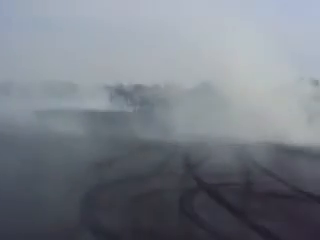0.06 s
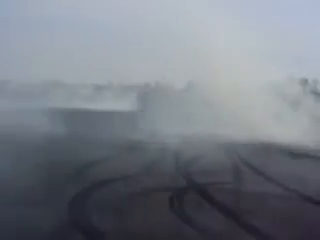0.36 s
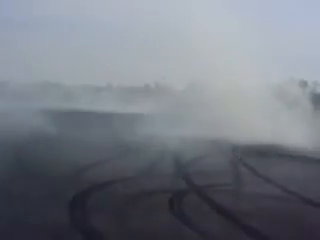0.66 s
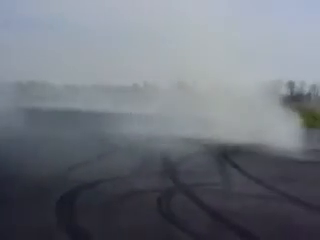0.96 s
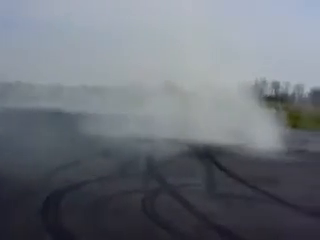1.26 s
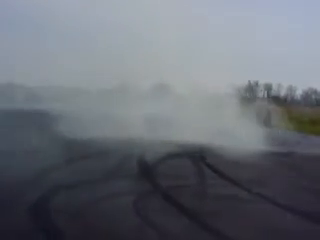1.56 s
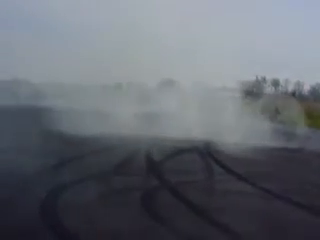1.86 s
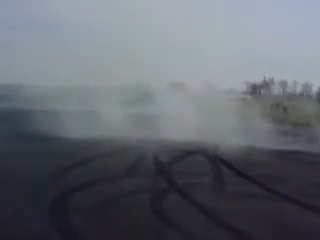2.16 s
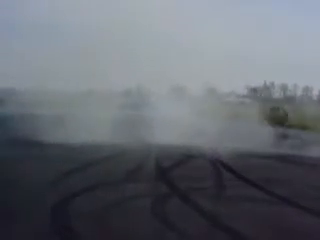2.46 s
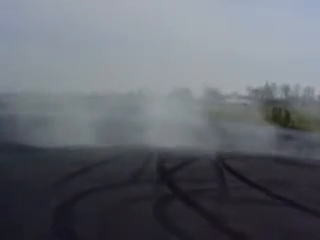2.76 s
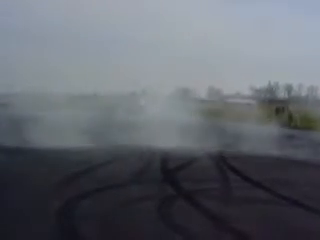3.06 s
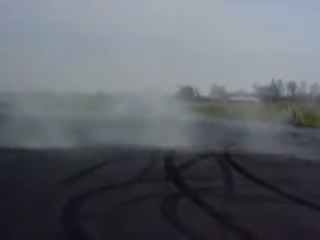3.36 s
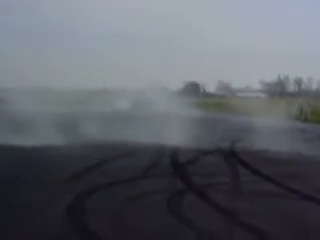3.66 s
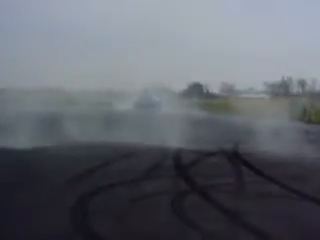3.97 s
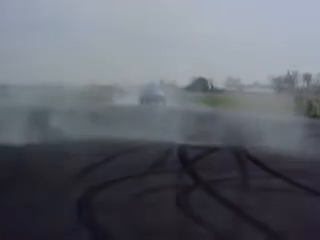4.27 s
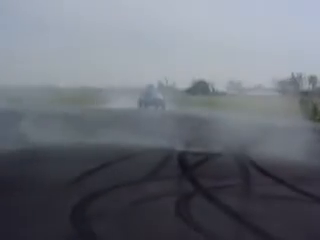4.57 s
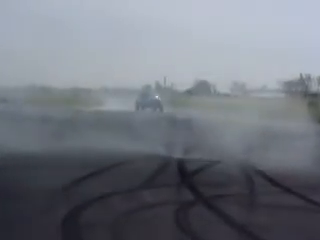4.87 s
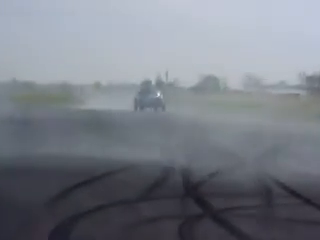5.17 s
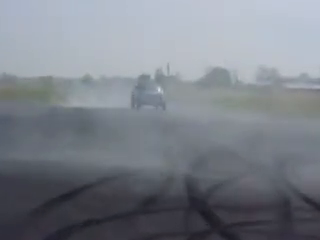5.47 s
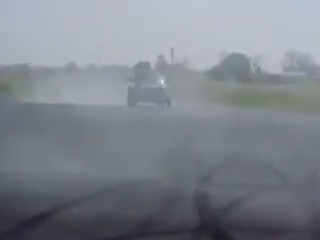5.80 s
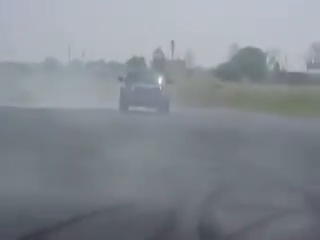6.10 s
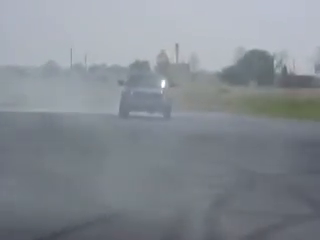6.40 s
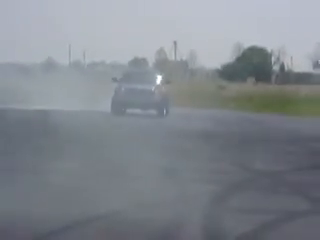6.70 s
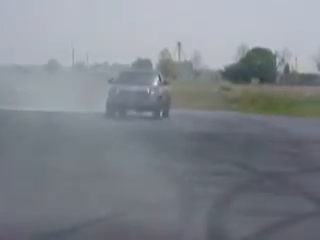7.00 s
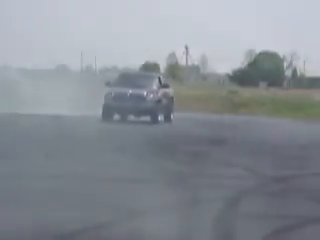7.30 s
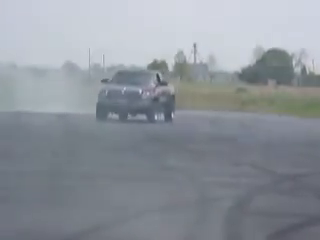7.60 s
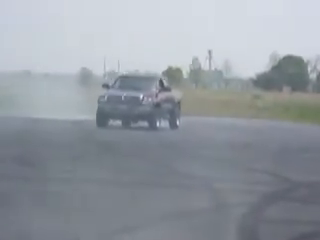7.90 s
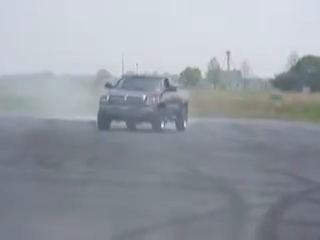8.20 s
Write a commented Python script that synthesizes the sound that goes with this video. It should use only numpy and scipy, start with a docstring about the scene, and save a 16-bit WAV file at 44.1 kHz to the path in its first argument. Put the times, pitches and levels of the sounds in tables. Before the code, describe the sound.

Loud, stuttering tyre squeals and rasping rubber cover a diesel pickup's engine for the first three and a half seconds, outdoors on open asphalt. Once the screeching stops, the engine revs up as the truck approaches, changes gear and settles into a steady rushing drone with a whine. Near the microphone are a faint diesel idle, soft wind rumble and a few small ticks.

```python
"""A diesel pickup spins its rear tyres on an open asphalt lot: they howl and scrub, then grip.
The rubber squeals because it grabs and lets go of the ground hundreds of times a second.
From far off the truck drives back with a rising exhaust drone, a whine and a broad rush, then shifts up.
Another diesel idles close by, wind nudges the microphone and a few small ticks sound near it."""
import sys
import numpy as np
from scipy import signal
from scipy.io import wavfile
from scipy.ndimage import uniform_filter1d

SR = 44100
rng = np.random.default_rng(int(sys.argv[2]) if len(sys.argv) > 2 else 0)


def put_to_file(sound):
    """Save the sound as 16-bit audio at rate SR, in the file named by the first command-line argument."""
    columns = np.atleast_2d(sound).T  # one column per channel
    safe = np.clip(columns, -1, 1)
    whole_steps = np.round(safe * 32767)
    wavfile.write(sys.argv[1], SR, whole_steps.astype(np.int16))


N = 363825


def from_db(db):
    """Turn decibels into a gain."""
    return 10 ** (np.asarray(db) / 20)


def rms_one(x):
    """Scale a signal to an average power of 1."""
    return x / np.sqrt(np.mean(x ** 2) + 1e-20)


def in_time(rows):
    """Join rows of (time, values...) with straight lines: one curve per value."""
    times, *columns = np.transpose(rows)
    return [np.interp(np.arange(N) / SR, times, column) for column in columns]


def drift(rate_hz):
    """A smooth random wobble, about 1 in size."""
    pole = np.exp(-80 * np.pi * rate_hz / SR)
    steps = rng.standard_normal(N // 40 + 2002)   # one for every 40 samples
    slow = signal.lfilter([1], [1, -2 * pole, pole * pole], steps)[2000:]
    return np.interp(np.arange(N) / 40, np.arange(len(slow)), rms_one(slow))


def phase_of(hz):
    """The phase (angle) of a tone that follows a pitch curve."""
    return 2 * np.pi * (np.cumsum(hz) / SR + rng.random())


def colour(x, spectrum):
    """Filter by a spectrum that falls 60 dB an octave past its ends; power 1."""
    hz, db = np.transpose(spectrum)
    grid = np.linspace(0, SR / 2, 2049)
    octave, known = np.log2(grid + 1), np.log2(hz)
    outside = np.abs(octave - np.clip(octave, known[0], known[-1]))
    taps = signal.firwin2(2049, grid, from_db(np.interp(octave, known, db) - 60 * outside), fs=SR)
    return rms_one(signal.fftconvolve(x, taps, "same"))


def noise(spectrum):
    """Noise with the given spectrum; power 1."""
    return colour(rng.standard_normal(N), spectrum)


def swell(start, end, rise_s, fall_s):
    """Fade in, hold, fade out; the fades are centred on start and end."""
    t = np.arange(N) / SR
    return np.clip(.5 + np.minimum((t - start) / rise_s, (end - t) / fall_s), 0, 1)


def swells(rows, rise_s, fall_s):
    """The gain of several swells, added in power."""
    return np.sqrt(sum((from_db(db) * swell(start, end, rise_s, fall_s)) ** 2 for start, end, db in rows))


# the light breeze (time [s], level [dB])
BREEZE_LEVEL = [(0, -49), (1.7, -57.5), (2.5, -41.5), (3.4, -47), (8.25, -39)]
# gusts on the microphone (start [s], end [s], level [dB])
WIND_GUSTS = [(-.1, .12, -32), (.57, .88, -31.5), (1.26, 1.37, -31.5), (2.64, 2.82, -32), (7.24, 7.45, -32)]
# the wind's rumble (frequency [Hz], relative level [dB])
WIND_SPECTRUM = [(20, -31), (45, -6), (80, -4), (130, 1), (230, -1), (350, -14.5), (600, -27)]
def wind():
    """Gusts over a light breeze bump the microphone with a low, lumpy rumble."""
    breeze_db, = in_time(BREEZE_LEVEL)
    level = np.hypot(from_db(breeze_db), swells(WIND_GUSTS, rise_s=.17, fall_s=.14))
    return level * from_db(2 * drift(11)) * noise(WIND_SPECTRUM)


# tones of the idle (multiple of the firing rate, relative level [dB])
IDLE_TONES = [(1, -43.5), (2, -41), (3, -46), (4, -57), (7, -58.5), (9, -44)]
# how loud the idle is (time [s], relative level [dB])
IDLE_LOUDNESS = [(0, -12.5), (1.5, -28), (3, -5.5), (4, -0.5), (8.25, 2)]
def idling_diesel(firing_hz=38.55):
    """The even firing of a diesel parked close by makes a low hum."""
    level_db, = in_time(IDLE_LOUDNESS)
    phase = phase_of(firing_hz * (1 + .0044 * drift(5.9)))
    hum = sum(from_db(db + 1.9 * drift(7.7)) * np.sin(k * phase) for k, db in IDLE_TONES)
    return from_db(level_db + 2.5) * hum


# each tick (time [s], relative level [dB], treble limit [Hz])
TICK_HITS = [(4.149, -7.5, 9000), (4.184, -4, 9000), (4.3185, -16.5, 6000), (6.7893, 3.5, 4200)]
def ticks(crunch_s=.0016):
    """Small hard things touch near the microphone: a dry snap and crunch in a body that barely rings."""
    hits = 0
    for start, db, top_hz in TICK_HITS:
        age = (np.arange(N) - int(start * SR)) / SR
        crunch = (age > 0) * np.exp(-np.clip(age / crunch_s, 0, 20)) * rng.choice([-1, 1], N)
        force = (age == 0) + from_db(-18) * crunch
        hits = hits + from_db(db) * signal.sosfilt(signal.butter(2, top_hz, fs=SR, output="sos"), force)
    snap = signal.sosfilt(signal.butter(4, 2800, "high", fs=SR, output="sos"), hits)
    body = signal.sosfilt(signal.butter(2, (2950, 4900), "band", fs=SR, output="sos"), snap)
    return from_db(-5) * snap + from_db(4) * body


def open_lot(x, dull_hz=2500, delay_s=.014, fade_s=.59, echo_db=-9):
    """The ground and far walls scatter back a faint, dull wash of echoes."""
    t = np.arange(SR // 2) / SR
    echoes = rng.standard_normal(len(t)) * (t > delay_s) * from_db(-60 * t / fade_s)
    dull = signal.sosfilt(signal.butter(1, dull_hz, fs=SR, output="sos"), x)
    return x + from_db(echo_db) * signal.fftconvolve(dull, echoes / np.sqrt(np.sum(echoes ** 2)))[:N]


# the whine (time [s], pitch [Hz], relative level [dB], steady share [0-1])
WHINE_PATH = [(4.4, 795, -54, 0), (5.15, 808, -41, .2), (5.6, 808, -44.5, .1), (6.6, 812, -40.5, .3),
              (7.3, 819, -35.3, .8), (8.25, 828, -34, .85)]
# its tones (multiple of the pitch, relative level [dB])
WHINE_TONES = [(1, 1.5), (2, -10.5), (2.12, -8)]
def driveline_whine():
    """The parts that turn the wheels sing, wavering from afar and firming up as the truck nears."""
    pitch, level_db, steady = in_time(WHINE_PATH)
    out = 0
    for k, db in WHINE_TONES:
        phase = phase_of(k * pitch * (1 + .003 * drift(45)))
        wavering = drift(22) * np.sin(phase) + drift(22) * np.cos(phase)
        tone = np.sqrt(steady) * np.sin(phase) + np.sqrt((1 - steady) / 2) * wavering
        out = out + from_db(level_db + db + 3.5) * tone
    return out


# the gears' note (time [s], base pitch [Hz], level [dB])
GEAR_PATH = [(6.1, 160.7, -62), (6.8, 166, -43), (7.6, 168.7, -41), (8.25, 174, -35.5)]
# its tones (multiple of the base pitch, relative level [dB])
GEAR_TONES = [(10, -4), (11, -3), (12, 0), (13, -7)]
def gears():
    """Thin gear notes climb with the truck's speed."""
    base_hz, level_db = in_time(GEAR_PATH)
    shaft = phase_of(base_hz * (1 + .003 * drift(90)))
    return sum(from_db(level_db + db + 2 * drift(15)) * np.sin(k * shaft) for k, db in GEAR_TONES)


# the rush, growing as the truck drives back (time [s], relative level [dB])
RUSH_LEVEL = [(0, -2.5), (.8, 1), (1.1, -11), (2, -4.5), (2.7, -3.5), (3.9, -6), (4.6, -4), (6.2, 0),
              (8.25, 1.8)]
# how hard the engine works (time [s], load [0-1])
ENGINE_LOAD = [(4.1, 0.16), (4.7, 0.95), (6.3, 0.96), (7, 0.73), (8.25, 0.76)]
# low roar, fuel injector clatter and air hiss, each (frequency [Hz], relative level [dB])
ROAR_SPECTRUM = [(45, -2.5), (95, -9.5), (140, -3), (185, -5), (250, -2), (355, -1), (430, -3), (520, -2.5),
                 (700, -2.5), (930, -6.5), (1130, -4.5), (1320, -10.5), (1600, -11)]
CLATTER_SPECTRUM = [(740, -27.5), (1250, 0), (1510, -7.5), (1710, 1.5), (1860, -0.5), (2060, 0),
                    (2160, 1.5), (2830, -0.5), (2980, -1), (3310, -11.5), (3800, -22.5), (4940, -44),
                    (8360, -120)]
AIR_SPECTRUM = [(1880, -26.5), (3200, -12), (3310, -4.5), (3840, -6), (5230, -7.5), (5890, -14),
                (7060, -13), (8030, -17.5), (8920, -16.5), (9310, -16.5), (10000, -27), (13000, -63.5),
                (22000, -120)]
def rush(firing):
    """Engine noise pulses with each firing; hard work deepens the roar's puffs and lifts the rest."""
    level_db, = in_time(RUSH_LEVEL)
    load, = in_time(ENGINE_LOAD)
    step_db = 2 * (np.arange(N) / SR > 6.7)   # the hiss steps up for the last stretch
    knock = rms_one((1 + .062 * np.sin(firing)) * from_db(drift(59)))
    puffs = rms_one(1 + load * (.3 * np.sin(firing) + .2 * np.sin(firing / 2)))
    roar = from_db(-28.5 + .5 * drift(5.6)) * puffs * noise(ROAR_SPECTRUM)
    clatter = from_db(-38 + 8.5 * load) * noise(CLATTER_SPECTRUM)
    hiss = from_db(-46.5 + 4.5 * load + step_db) * noise(AIR_SPECTRUM)
    return from_db(level_db) * (roar + knock * (clatter + hiss))


# engine speed, climbing until the gear change (time [s], firing rate [Hz])
ENGINE_SPEED = [(0, 115), (.6, 120), (.85, 104), (4.5, 106), (4.8, 121), (5.25, 131), (5.6, 144),
                (6.15, 155), (6.6, 164), (6.95, 124), (7.38, 128), (7.8, 126.7), (8.25, 129.5)]
# the driver presses the pedal (start [s], end [s], exhaust level [dB])
PEDAL_PRESSES = [(-.1, .35, -40), (.4, .78, -35.5), (4.58, 5.28, -39), (5.58, 6.55, -37.5), (7.0, 8.5, -43)]
# exhaust tones (multiple of the firing rate, gain before the gear change [dB], gain after [dB])
EXHAUST_TONES = [(.5, -13, -13), (1, 3, -7), (1.5, -7, -12), (2, -4, 7.5), (2.5, -6, -11), (3, -4, -12),
                 (3.5, -5, -12), (4, -11, -10), (6.5, -8, -14), (7, -6.5, -10), (7.5, -8, -12),
                 (9, -13, -10)]
# where the exhaust pipe rings (frequency [Hz], half width [Hz], boost [dB])
PIPE_RESONANCES = [(231, 8, 7), (278, 8, 11), (373, 30, 4), (1150, 57, 7)]
def exhaust(shift_s=6.88, coasting_db=-51.5):
    """Firings drone through the pipe, then boom in the higher gear. Gives the sound and firing phase."""
    firing_hz, = in_time(ENGINE_SPEED)
    level = np.hypot(from_db(coasting_db), swells(PEDAL_PRESSES, rise_s=.25, fall_s=.18))
    shifted, = in_time([(shift_s - .1, 0), (shift_s + .1, 1)])
    firing = phase_of(firing_hz * (1 + .006 * drift(22)))
    drone = 0
    for k, before_db, after_db in EXHAUST_TONES:
        tone_db = before_db + shifted * (after_db - before_db)
        pipe_db = sum(db / (1 + ((k * firing_hz - hz) / width) ** 2) for hz, width, db in PIPE_RESONANCES)
        drone = drone + from_db(tone_db + pipe_db + 2 * drift(13)) * np.sin(k * firing)
    return level * drone, firing


# scrubbing rubber, its hiss and its rasp, each (frequency [Hz], relative level [dB])
SCRUB_SPECTRUM = [(330, -17.5), (420, -4), (800, 4), (1000, -2.5), (1450, -4.5), (1710, 1.5), (1990, -3),
                  (2520, 1), (2840, -6.5), (3340, -13.5), (3730, -31), (5000, -27)]
HISS_SPECTRUM = [(2060, -23.5), (3500, 0.5), (3770, -5), (4740, -7.5), (6330, -15.5), (8730, -19.5),
                 (9530, -21), (10000, -29.5), (13000, -64), (22000, -120)]
RASP_SPECTRUM = [(3700, -3), (4200, -2), (4800, 1), (5300, -21)]
def scrubbing(slip_phase, scrub_db, hiss_db):
    """Each slip of the shuddering tyre throws a puff of noise; a bright rasp comes as it starts to grip."""
    shudder = rms_one(from_db(1.06 * drift(23)) * (1 + .15 * np.sin(slip_phase)))
    scrub = from_db(scrub_db + 4) * noise(SCRUB_SPECTRUM)
    grit = rng.standard_normal(N) * from_db(1.2 * drift(300))
    hiss = from_db(hiss_db + 1) * colour(grit, HISS_SPECTRUM)
    rasp = from_db(-38) * swell(2.9, 3.19, rise_s=.056, fall_s=.12) * noise(RASP_SPECTRUM)
    return shudder * (scrub + hiss + rasp)


# moments when the tread tears harder (start [s], end [s], level [dB])
TEAR_SURGES = [(.02, .135, -26), (.135, .2, -34), (.52, .62, -31), (.98, 1.04, -23), (1.19, 1.3, -27),
               (1.32, 1.43, -26), (2.98, 3.03, -24.5), (3.22, 3.29, -29.5)]
# tearing rubber (frequency [Hz], relative level [dB])
TEAR_SPECTRUM = [(1400, -10), (1650, -4.5), (1950, 0), (2250, 4), (2600, -5), (3000, -10.5)]
def tearing(slip_phase):
    """Rubber tears off in short surges, chopped up by the slips of the tread."""
    chop = rms_one((1 + .5 * np.sin(slip_phase)) * from_db(3 * drift(82)))
    return swells(TEAR_SURGES, rise_s=.017, fall_s=.028) * chop * noise(TEAR_SPECTRUM)


def loose_slip(pitch, wander, jitter, flutter_db):
    """Phase and strength of rubber that grabs and lets go on uneven asphalt."""
    phase = phase_of(pitch * (1 + wander * drift(14) + jitter * drift(219)))
    return phase, rms_one(from_db(flutter_db * drift(47)))


def locked_slip(pitch, jitter, flutter_db):
    """Phase and strength of rubber locked on one note: nearly even, with a trembling pitch."""
    phase = phase_of(pitch * (1 + .004 * drift(24.06) + jitter * drift(267)))
    return phase, rms_one(from_db(flutter_db * drift(30)))


# short shrieks (start [s], end [s], first pitch [Hz], last pitch [Hz], level [dB])
RIB_SHRIEKS = [(0, 0.17, 1315, 1335, -22), (0.071, 0.128, 1590, 1650, -22), (.13, 0.235, 1615, 1622, -24),
               (0.134, 0.233, 710, 695, -22), (.39, 0.534, 825, 845, -21.5),
               (0.501, 0.699, 705, 670, -12.5), (.52, .65, 1140, 1090, -18.5),
               (.66, 0.767, 1130, 1170, -19), (0.78, .92, 1100, 1105, -17.5), (0.72, 0.813, 683, 692, -7.5),
               (.83, .925, 695, 712, -12.5), (1.093, 1.262, 1200, 1238, -15),
               (1.152, 1.52, 1692, 1655, -22), (1.51, 1.74, 1180, 1208, -14), (1.76, 1.87, 1198, 1185, -13),
               (1.88, 2.08, 1185, 1192, -20), (2.07, 2.19, 1160, 1094, -21),
               (1.773, 2.231, 1664, 1699, -24.5), (2.03, 2.239, 630, 668, -14),
               (2.214, 2.6, 1018, 1060, -21), (2.301, 2.797, 687, 687, -23),
               (2.881, 3.024, 1185, 1220, -22), (2.894, 3.033, 1416, 1377, -20),
               (3.072, 3.2, 615, 635, -21), (3.122, 3.266, 1278, 1180, -15), (3.239, 3.47, 612, 605, -19),
               (3.26, 3.29, 590, 590, -14), (3.33, 3.45, 1100, 1130, -25)]
def shrieks():
    """Single ribs of the tread catch, glide in pitch, swell and let go."""
    out = 0
    for start, end, first_hz, last_hz, db in RIB_SHRIEKS:
        pitch, progress = in_time([(start, first_hz, 0), (end, last_hz, 1)])
        phase, strength = loose_slip(pitch, wander=.005, jitter=.011, flutter_db=2.5)
        tone = np.sin(phase) + .11 * np.sin(2 * phase)
        out = out + from_db(db) * np.sin(np.pi * progress) * strength * tone
    return out


# the other rear tyre's squeal (time [s], pitch [Hz], relative level [dB])
SECOND_TYRE_PATH = [(1.22, 774.6, -50), (1.32, 767, -16), (1.44, 754, -27), (1.5, 737, -15.5),
                    (1.59, 739, -15.5), (1.62, 754, -25), (1.67, 765, -12), (1.76, 780, -17.5),
                    (1.8, 798, -11.5), (1.88, 803, -13), (1.93, 816, -14), (1.95, 857, -27),
                    (2, 811.3, -23), (2.18, 850, -30), (2.3, 885, -51)]
def second_tyre():
    """The other rear tyre locks on to a higher note, climbs in steps and lets go."""
    pitch, level_db = in_time(SECOND_TYRE_PATH)
    phase, strength = locked_slip(pitch, jitter=.012, flutter_db=1.4)
    return from_db(level_db + 1.5) * strength * (np.sin(phase) + .14 * np.sin(2 * phase))


# the howl's overtones (multiple of a block's pitch, relative level [dB])
TREAD_OVERTONES = [(2, 4.5), (3, -6), (4, -23.5)]
def tread_howl(pitch, force, blocks=6):
    """Tread blocks howl at scattered pitches: lower, wider apart and brighter in a hard slide."""
    middle_hz = pitch * (.98 - .065 * force)
    spread = .068 + .055 * force
    lowest_hz = 580 - 100 * force ** 2   # blocks fade out below this pitch
    gains = [(k, from_db(db + 2 * (k - 3.5) * force)) for k, db in TREAD_OVERTONES]
    howl, overtones = 0, 0
    for place in np.linspace(-1, 1, blocks):
        hz = middle_hz * (1 + place * spread)
        phase, strength = loose_slip(hz, wander=.034, jitter=.036, flutter_db=4.5)
        block_db = 4.7 * place - .13 * np.maximum(lowest_hz - hz, 0)
        howl = howl + from_db(block_db) * strength * np.sin(phase)
        overtones = overtones + strength * sum(gain * np.sin(k * phase) for k, gain in gains)
    return rms_one(howl), rms_one(overtones)


def friction_limit(x, amount):
    """Friction limits how far the rubber swings, softening the throb between its tones."""
    power = uniform_filter1d(x ** 2, size=300) + .05
    return rms_one(x * power ** (-amount / 2))


# squeal bursts (start [s], end [s], relative level [dB], clean share [0-1], overtone level [dB])
SQUEAL_BURSTS = [(-.05, 0.24, -21, 0.35, -34), (0.399, 0.536, -17.5, 0.72, -34),
                 (0.512, 0.674, -11, 0.81, -22), (0.68, 0.812, -13.5, 0.57, -19),
                 (0.883, 1.003, -12, 0.76, -19.5), (1.072, 1.239, -12, 0.93, -20),
                 (1.26, 1.32, -18, .8, -24), (1.334, 1.5, -19.5, 0.2, -19), (1.62, 1.767, -13.5, 0.5, -30),
                 (1.827, 1.894, -12, 1, -26), (1.926, 2.148, -10, 0.98, -37),
                 (2.207, 2.393, -17.5, 0.41, -21.5), (2.392, 2.54, -11.5, 0.83, -20),
                 (2.577, 2.625, -18.5, .9, -26), (2.644, 2.699, -19, .95, -27),
                 (2.759, 2.85, -22.5, .9, -24), (2.89, 3.025, -21.5, 0.99, -31),
                 (3.125, 3.25, -14.5, 0.8, -19.5), (3.261, 3.363, -14.5, 0.44, -24),
                 (3.367, 3.45, -17, .6, -25.5), (3.46, 3.533, -26, .6, -35)]
def bursts():
    """The tyre bursts into song: the power of its clean tone, rough howl and overtones."""
    clean, rough, upper = 0, 0, 0
    for start, end, db, share, overtone_db in SQUEAL_BURSTS:
        shape = swell(start, end, rise_s=.041, fall_s=.071)
        power = (from_db(db) * shape) ** 2
        clean = clean + share * power
        rough = rough + (1 - share) * power
        upper = upper + (from_db(overtone_db) * shape) ** 2
    return clean, rough, upper


# how fast the rubber grabs and lets go (time [s], pitch [Hz])
SQUEAL_PITCH = [(0, 800.6), (.22, 793), (.38, 629), (.52, 610.3), (.65, 584), (.72, 603.5), (.86, 608),
                (.915, 645.6), (.95, 687), (1.0, 686), (1.04, 591.5), (1.09, 618), (1.21, 613),
                (1.27, 580.2), (1.44, 570), (1.7, 580.8), (1.85, 604), (2, 593.8), (2.13, 575),
                (2.5, 599.6), (2.82, 611.9), (2.93, 723), (3.02, 703), (3.1, 633), (3.21, 672.4),
                (3.42, 672), (3.6, 603)]
# how hard it slides (time [s], relative scrub level [dB], relative hiss level [dB])
SLIDE_LEVELS = [(0, -26, -39.5), (.1, -24, -40), (.28, -38, -43.5), (.45, -39, -52), (.57, -26, -55),
                (.75, -26.5, -59), (.85, -24, -37), (1.02, -20.5, -36), (1.38, -19, -35),
                (1.52, -22.5, -36.5), (2.1, -23, -37.5), (2.27, -22.5, -32.5), (2.55, -27, -37),
                (2.85, -25, -41), (3, -22, -39), (3.2, -30.5, -40.5), (3.42, -44.5, -49), (3.6, -54, -58)]
def spinning_tyres(full_slide_db=-18):
    """Sliding rubber squeals in bursts inside a rough howl and scrub, until the tyres grip."""
    pitch, = in_time(SQUEAL_PITCH)
    scrub_db, hiss_db = in_time(SLIDE_LEVELS)
    clean_power, rough_power, upper_power = bursts()
    phase, strength = locked_slip(pitch, jitter=.011, flutter_db=1.5)
    force = np.minimum(from_db(scrub_db - full_slide_db), 1)
    howl, howl_overtones = tread_howl(pitch, force)
    howl_db = scrub_db - .05 * np.maximum(pitch - 600, 0)   # weaker as the pitch climbs past 600 Hz
    power = clean_power + rough_power + from_db(howl_db + 5.5) ** 2
    clean_share = clean_power / power
    squeal_gain = np.sqrt(2 * clean_share) * strength
    voice = squeal_gain * np.sin(phase) + np.sqrt(1 - clean_share) * howl
    low = from_db(-.8) * np.sqrt(power) * friction_limit(voice, amount=.23)
    squeal_overtones = squeal_gain * (.19 * np.sin(2 * phase) + .14 * np.sin(3 * phase))
    high = np.hypot(from_db(howl_db + 2.6), np.sqrt(upper_power)) * (howl_overtones + squeal_overtones)
    rubber_noise = scrubbing(phase, scrub_db, hiss_db) + tearing(phase)
    sliding, = in_time([(3.44, 1), (3.58, 0)])   # the tyres grip and fall silent
    return sliding * (low + high + rubber_noise + second_tyre() + shrieks())


def scene():
    """The truck and its surroundings at one microphone; only the tyres echo."""
    drone, firing = exhaust()
    truck = open_lot(spinning_tyres()) + drone + rush(firing) + driveline_whine() + gears()
    return (truck + idling_diesel() + wind() + ticks())[None]


def record(dry, cutoff_hz=10050):
    """Round off the loudest peaks and cut the highest treble."""
    rounded = dry / (1 + (dry / .95) ** 6) ** (1 / 6)
    return signal.sosfilt(signal.ellip(10, .2, 80, cutoff_hz, fs=SR, output="sos"), rounded)


dry = scene()
out = record(dry)
put_to_file(out)
```